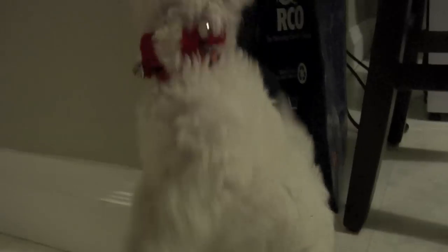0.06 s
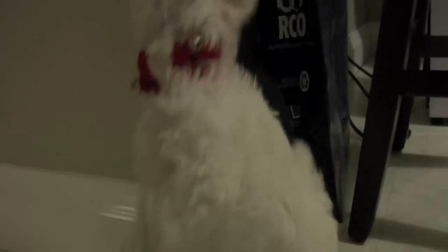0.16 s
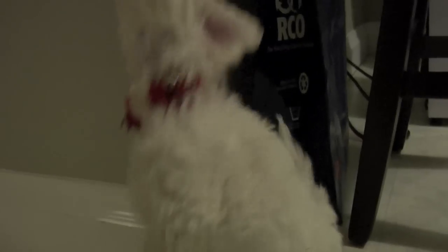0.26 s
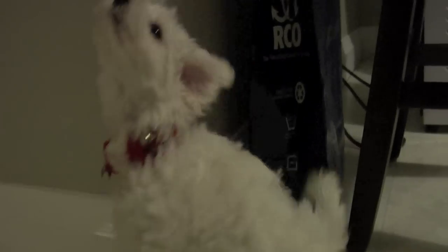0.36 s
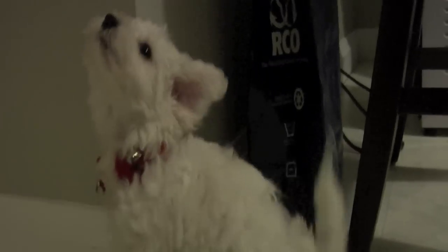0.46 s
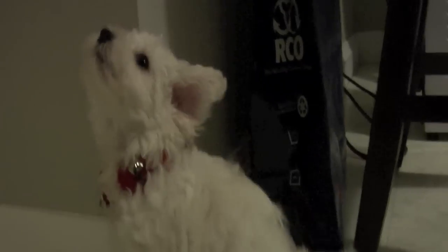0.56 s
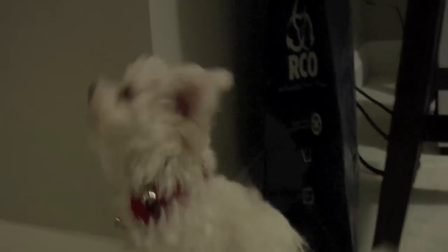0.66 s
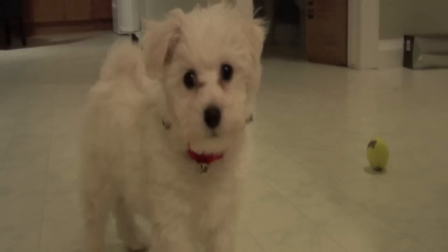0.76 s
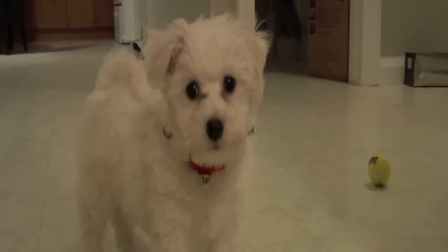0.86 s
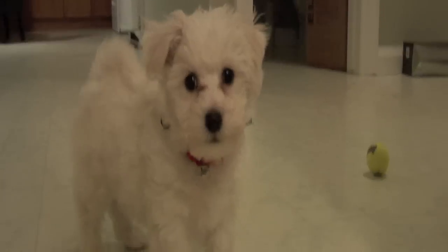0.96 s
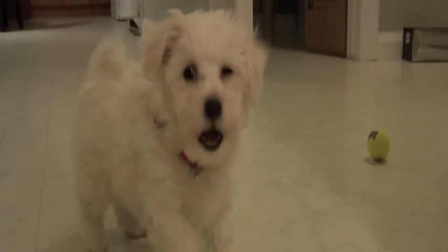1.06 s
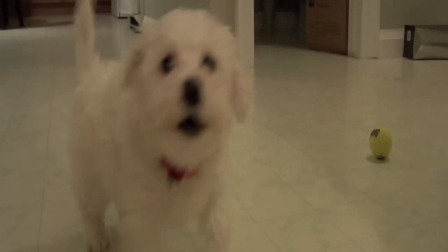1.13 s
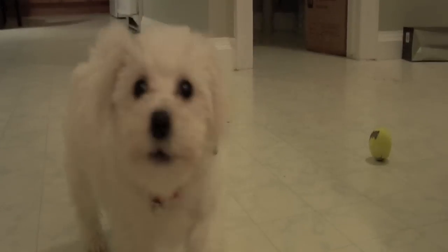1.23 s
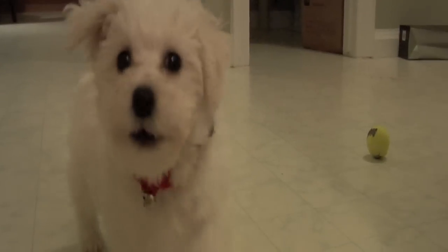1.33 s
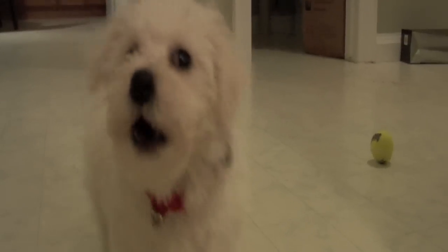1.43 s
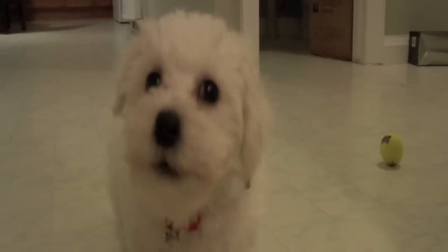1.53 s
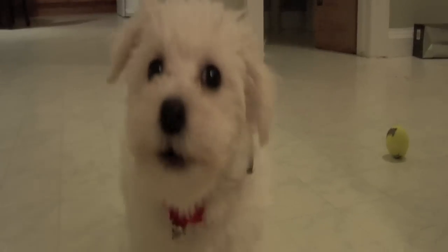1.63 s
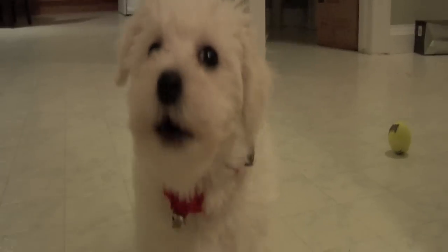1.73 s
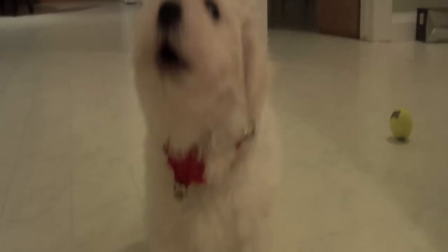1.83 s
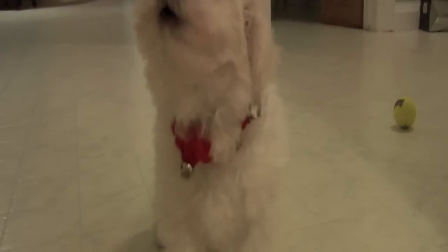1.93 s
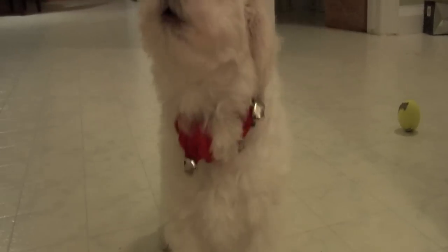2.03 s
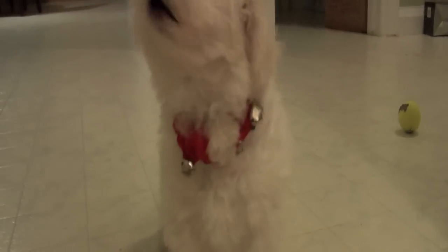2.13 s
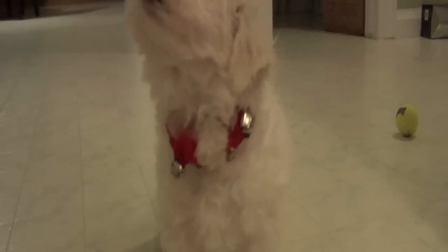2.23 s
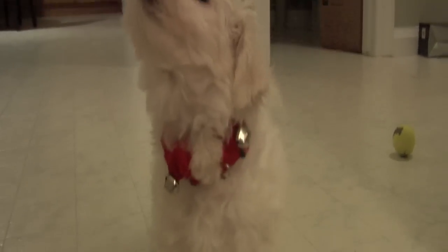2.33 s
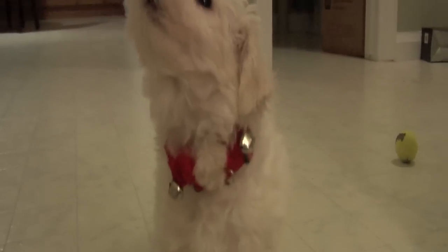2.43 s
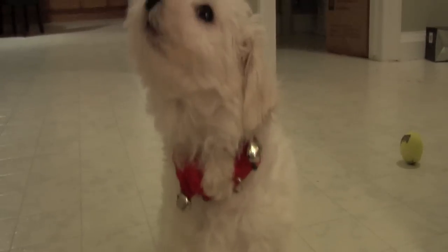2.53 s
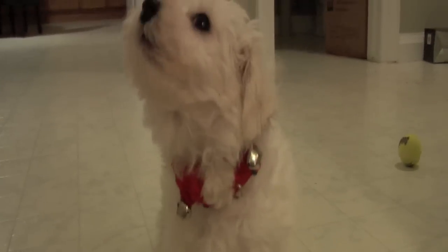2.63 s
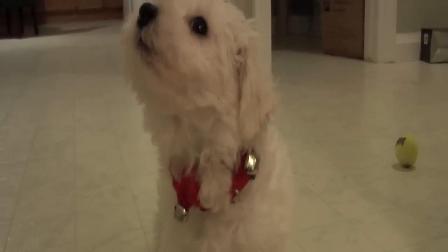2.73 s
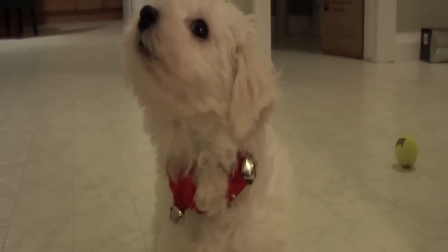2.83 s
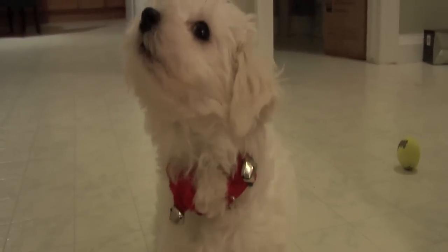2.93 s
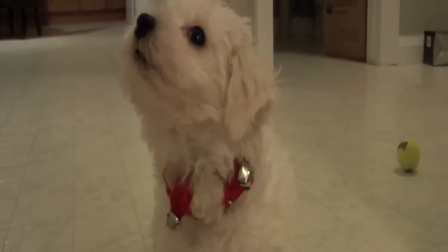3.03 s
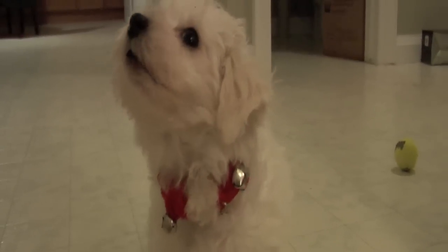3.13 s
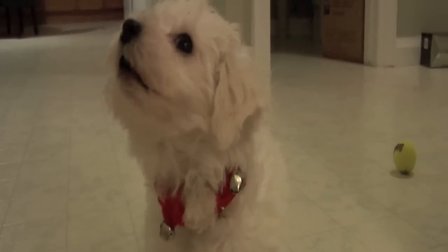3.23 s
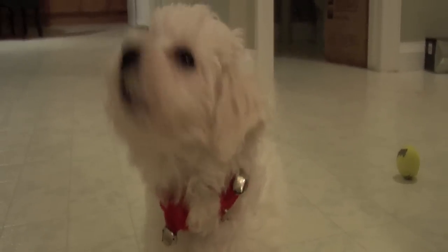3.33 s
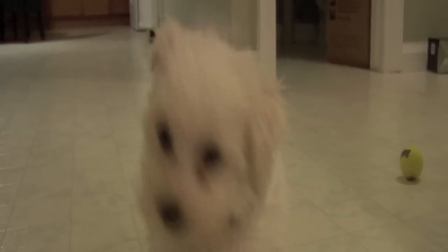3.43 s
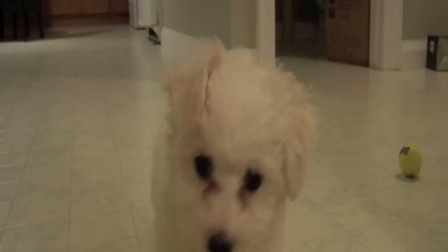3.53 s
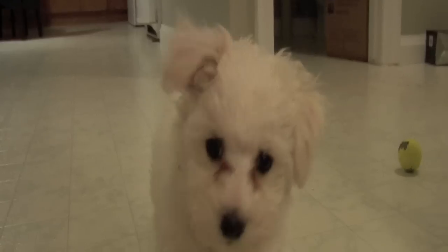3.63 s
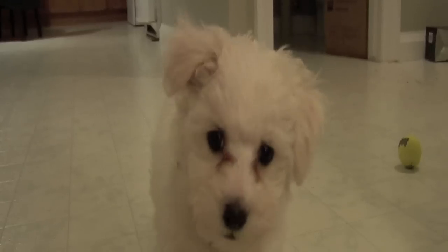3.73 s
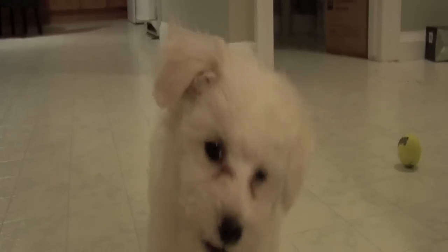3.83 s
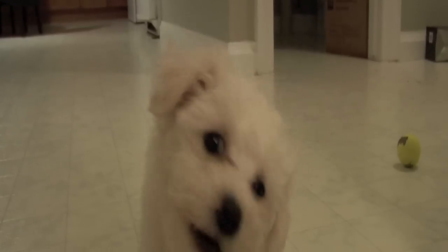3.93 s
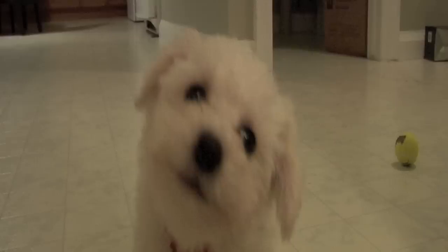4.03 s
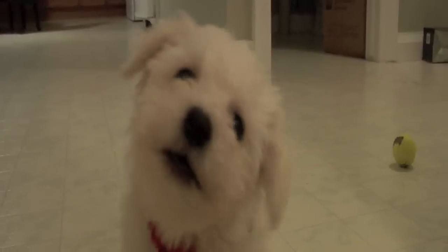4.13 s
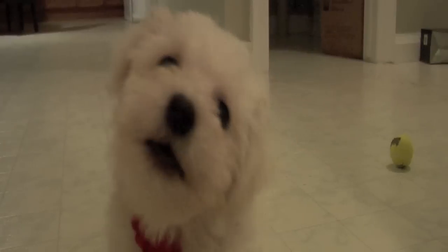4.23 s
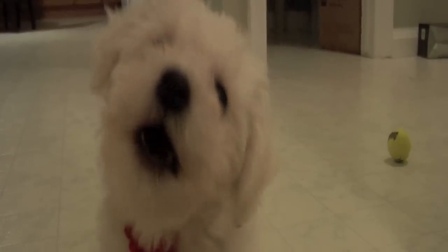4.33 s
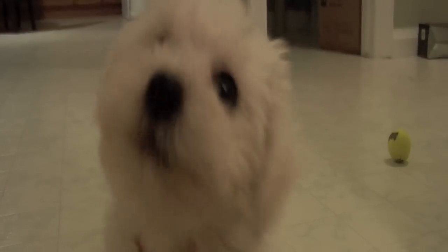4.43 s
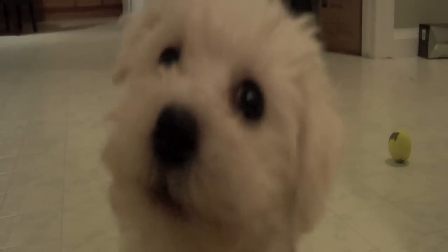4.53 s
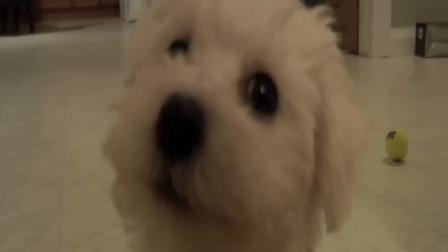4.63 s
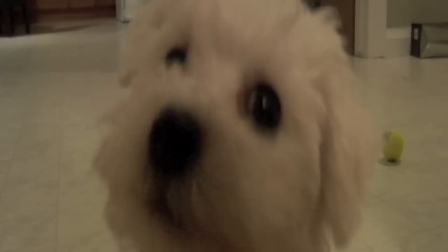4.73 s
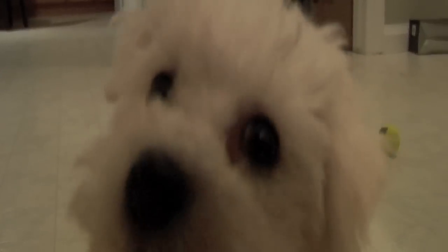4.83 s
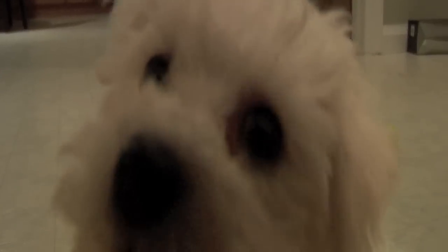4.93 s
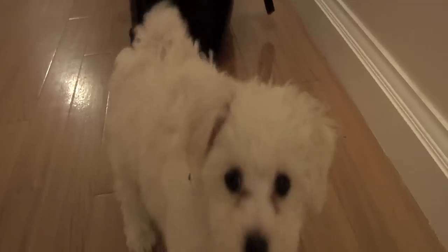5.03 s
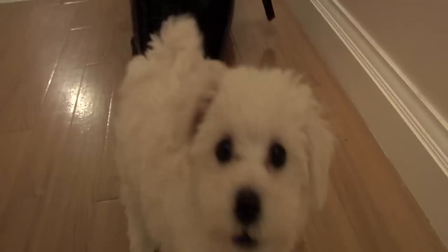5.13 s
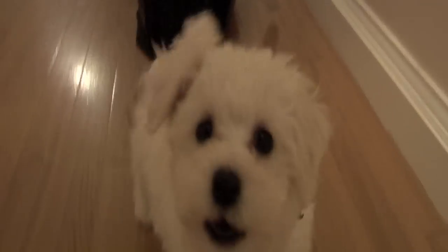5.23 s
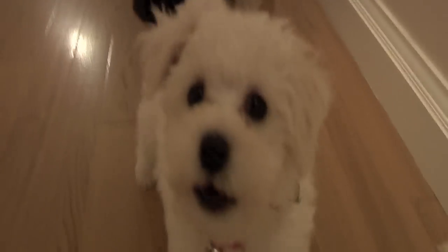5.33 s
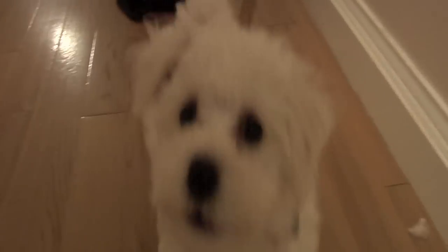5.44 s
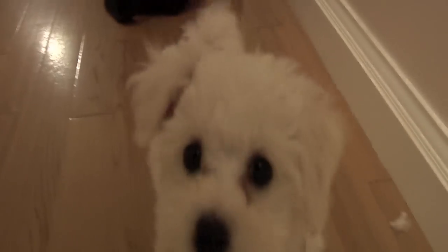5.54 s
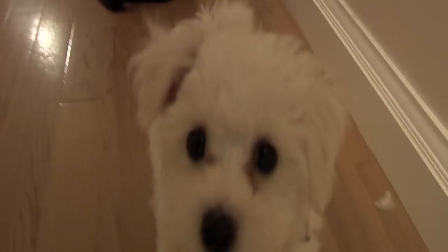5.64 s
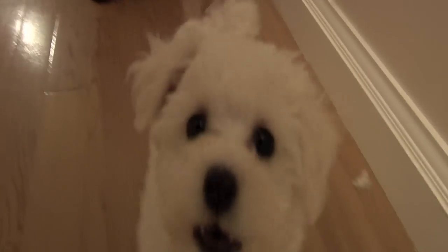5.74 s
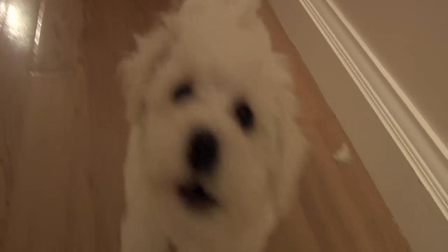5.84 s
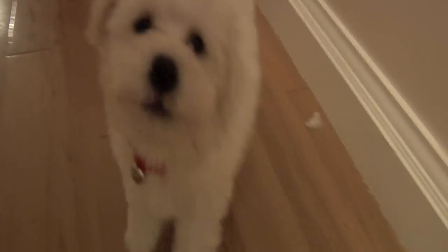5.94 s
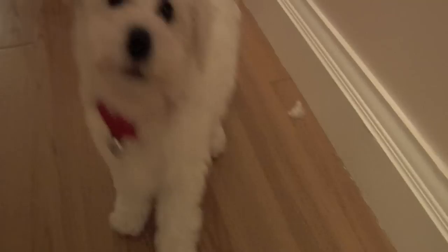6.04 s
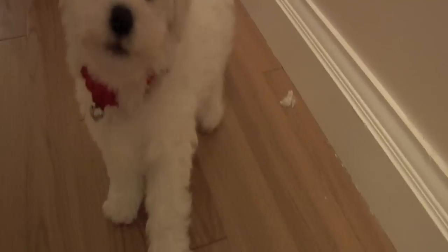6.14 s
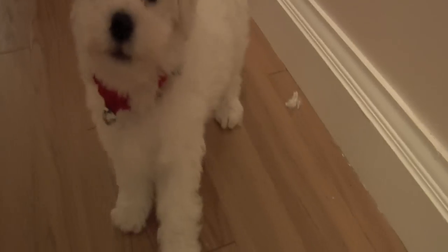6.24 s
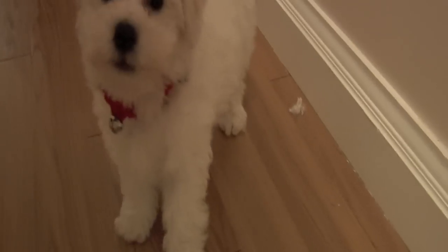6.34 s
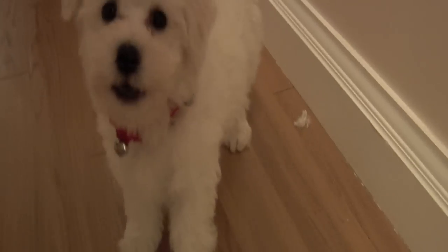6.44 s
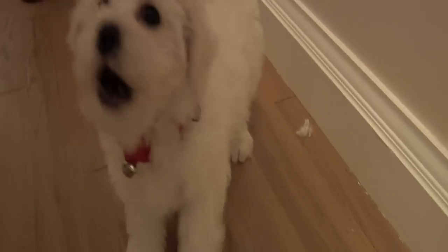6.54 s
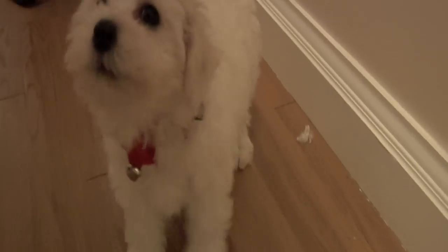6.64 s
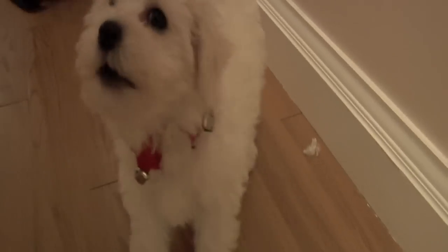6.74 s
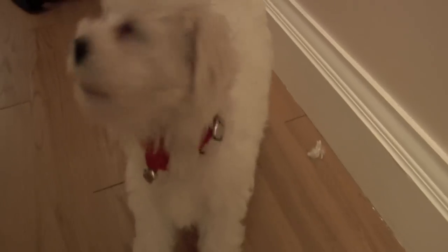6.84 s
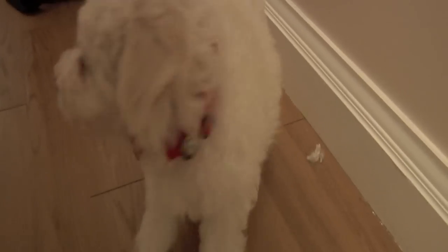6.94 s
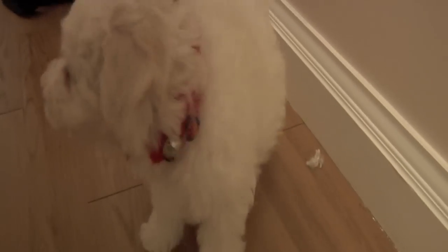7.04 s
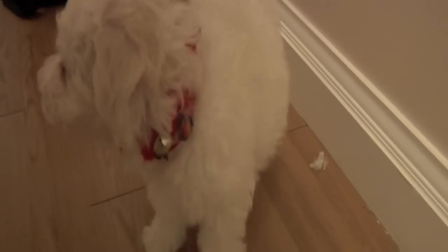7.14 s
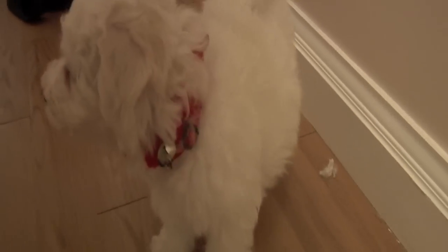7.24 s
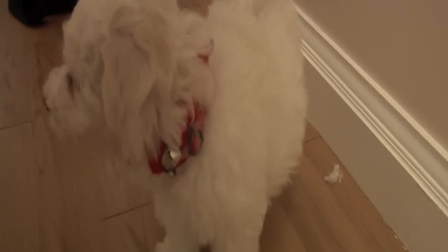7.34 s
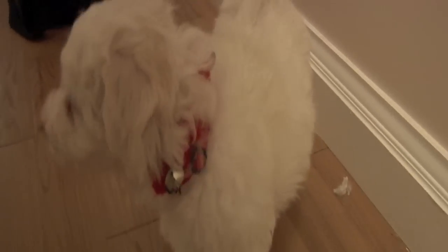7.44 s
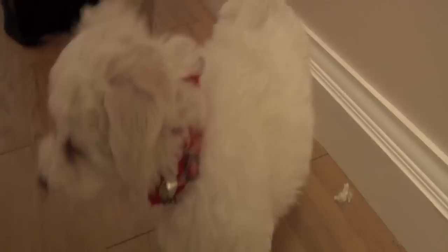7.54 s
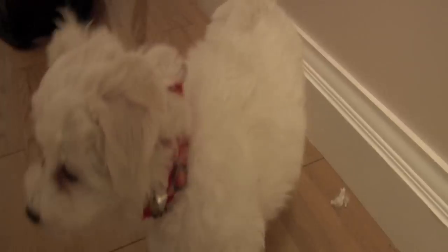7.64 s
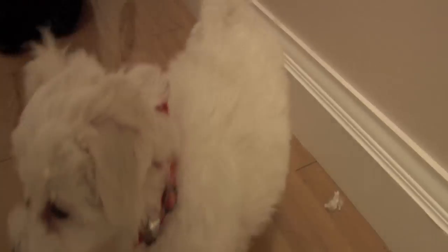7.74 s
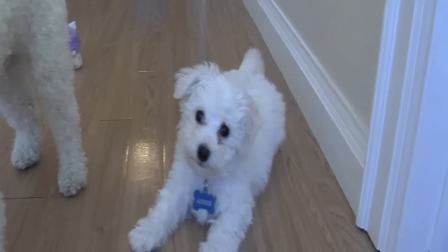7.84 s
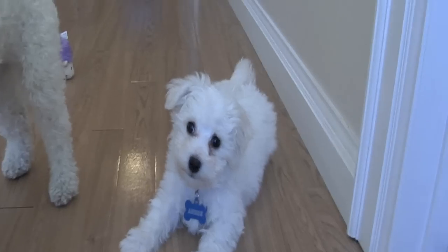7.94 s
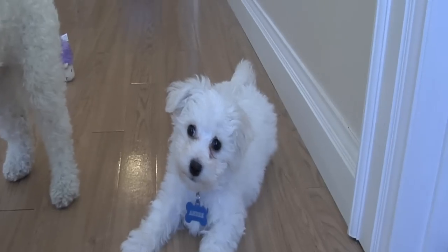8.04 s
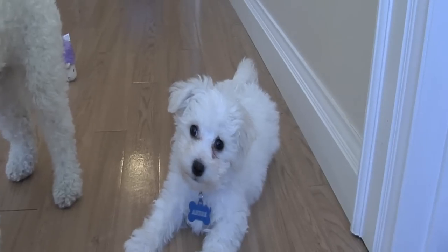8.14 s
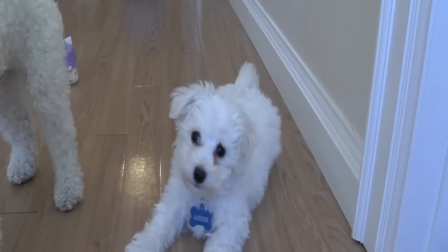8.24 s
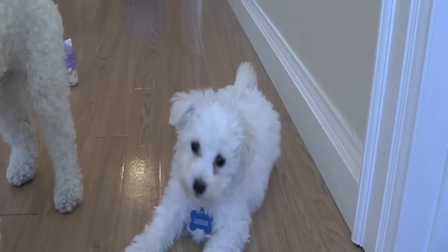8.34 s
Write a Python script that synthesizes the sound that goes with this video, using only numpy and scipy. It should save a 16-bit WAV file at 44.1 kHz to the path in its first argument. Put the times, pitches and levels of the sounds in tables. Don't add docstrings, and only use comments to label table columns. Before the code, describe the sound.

Indoors, a young dog alternates piercing, squeezed yaps with quieter, rough, buzzing grumbles that sometimes flip up into yelps. Lively room echo swells after each yap. There are tiny high bell tinkles, dull paw thumps and faint scuffs, over steady low hiss and a wavering appliance hum. Three short drops to near silence mark new takes; the last stretch has only light paw knocks and quiet room air.

```python
import sys
import numpy as np
from scipy import signal
from scipy.fft import rfft, irfft, next_fast_len
from scipy.io import wavfile
from scipy.ndimage import uniform_filter1d

SR = 44100
rng = np.random.default_rng(int(sys.argv[2]) if len(sys.argv) > 2 else 0)


def magnitude_from_level(level_db):
    exponent = np.asarray(level_db, float) / 20
    return 10 ** exponent


def unload_audio(sound):
    columns = np.transpose(np.atleast_2d(sound))
    steps = np.round(np.clip(columns, -1, 1) * 32767)
    wavfile.write(sys.argv[1], SR, steps.astype(np.int16))


N = 369558
LEAD = SR // 5


def evened(x):
    return x / np.sqrt(np.mean(np.abs(x) ** 2) + 1e-20)


def read(points, hz):
    f, value = np.transpose(points)
    return np.interp(np.log(hz + 1), np.log(f + 1), value)


def curve(points):
    return np.interp(np.arange(N) / SR, *np.transpose(points))


def add(mix, s, sound):
    part = mix[round(s * SR) + LEAD:][:len(sound)]
    part += sound[:len(part)]


def fuzz(count, hz, width):
    r = np.exp(-np.pi * width / SR)
    noise = rng.standard_normal(count) + 1j * rng.standard_normal(count)
    slow = signal.lfilter([1], [1, -r], noise)
    return evened((slow * np.exp(2j * np.pi * hz * np.arange(count) / SR)).real)


def between(rows, place):
    left = np.minimum(place.astype(int), rows.shape[1] - 2)
    return rows[:, left] + (rows[:, left + 1] - rows[:, left]) * (place - left)


def peak(hz, centre, width):
    return 1 / (1 + 2j * (hz - centre) / width) ** 2


# frequency in Hz, level in dB per Hz.
AIR = [(20, -9), (50, -4), (170, -12), (400, -12.5), (640, -7.5), (760, -15.5), (3000, -24), (15500, -31)]
# pitch in Hz, wavering width in Hz, level in dB.
HUM = [(609, 16, -68)]
# time in seconds, level in dB.
HUM_SHARE = [(0, -2), (7.8, -1), (7.9, -8), (8.4, -7)]


def background():
    hz = np.fft.rfftfreq(N, 1 / SR)
    air = evened(irfft(rfft(rng.standard_normal(N)) * magnitude_from_level(read(AIR, hz)), N))
    t = np.arange(N) / SR
    hum = sum(magnitude_from_level(db) * (np.sin(2 * np.pi * f * t) + 0.86 * fuzz(N, f, w)) for f, w, db in HUM)
    return magnitude_from_level(-68.5) * air + magnitude_from_level(curve(HUM_SHARE)) * hum


# start in seconds, peak level in dB, pitch in Hz,
# time to die by 60 dB in seconds, level of the tick in dB beside the bump.
BUMPS = [(0.847, -57.5, 200, .08, -14), (3.318, -28, 354, 0.035, -30.5), (3.332, -55, 868, 0.037, 1),
         (3.46, -32.5, 107, .15, -72), (3.861, -49, 965, 0.069, -8), (4.78, -39.5, 71.5, 0.21, -70),
         (5.985, -24, 154.6, 0.096, -35), (6.885, -32.5, 195, 0.071, -32), (7.92, -48, 412, 0.021, -34),
         (7.945, -38, 538, 0.055, -1.5), (7.954, -40, 183.1, 0.05, -12)]
# middle in seconds, length in seconds, level in dB, pitch in Hz, width in Hz.
SCUFFS = [(3.34, 0.054, -52.5, 2700, 800), (2.668, 0.083, -55, 6610, 4000),
          (3.469, 0.094, -48.5, 13000, 4850), (6.903, 0.071, -71, 9200, 1226),
          (7.774, 0.053, -60.5, 3492, 4600)]


def floor_contacts():
    out, t = np.zeros(N + LEAD), np.arange(8000) / SR
    for s, db, hz, t60, tick_db in BUMPS:
        body = fuzz(len(t), hz, 0.21 * hz) * magnitude_from_level(-60 * t / t60) * np.minimum(t * hz * 2, 1)
        tick = fuzz(len(t), 3000, 1600) * magnitude_from_level(tick_db - 60 * t / 0.018)
        add(out, s, magnitude_from_level(db - 2.5) * (body + tick))
    for s, length, db, hz, width in SCUFFS:
        count = int(length * SR)
        add(out, s - length / 2, magnitude_from_level(db) * fuzz(count, hz, width) * np.hanning(count))
    return out


# pitch in Hz, level in dB, time to die by 60 dB in seconds.
BELL = [(6961, 0, .12), (8156, -6, .12), (8527, -7, .1), (9044, -7, .1), (10250, -14, .1), (11111, -4, .08),
        (12893, -1, .08)]
# start in seconds, level in dB.
JINGLES = [(0.051, -60), (0.099, -61), (0.15, -83), (0.167, -63), (0.385, -68), (.415, -70), (0.466, -61),
           (3.547, -63.5), (4.178, -73), (5.682, -65), (6.1, -74), (6.954, -67), (7.058, -72), (7.096, -70),
           (7.172, -73)]


def bell():
    out, t = np.zeros(N + LEAD), np.arange(6000) / SR
    favour_db = 2.2 * rng.standard_normal((len(JINGLES), len(BELL)))
    for (s, strike_db), favour in zip(JINGLES, favour_db):
        ring = np.zeros(len(t))
        for (hz, db, t60), extra_db in zip(BELL, favour):
            ring += magnitude_from_level(db + extra_db - 60 * t / t60) * np.sin(2 * np.pi * hz * t)
        add(out, s, magnitude_from_level(strike_db) * ring)
    return out


# middle in seconds, half length in seconds, roughness 0-1.
CRACKS = [(1.866, .011, .35), (5.116, .006, .3), (6.569, .014, .6)]
BREAK_HZ, BREAK_OCTAVES = 726, 0.27
FIRM_DB, FIRM_CLEARS = -27.5, 0.77
GRUMBLE_HALF_DB, HOARSE_HALF_DB = 7.5, -3
OPEN_HZ, MOUTH_POWER, HOARSE_MOUTH = 1030, 0.69, 1.393
FLIP_S, FLIP_ROUGH, YELP_ROUGH = .018, .2, .003


def manner(t, effort_db, hz, hoarse_s, grumble_rough, yelp_half_db, mouth, tilt_db):
    yelp = (1 + np.tanh(np.log2(hz / BREAK_HZ) / BREAK_OCTAVES)) / 2
    yelp = np.maximum.accumulate(yelp)
    flip = np.clip(np.gradient(yelp, t) * FLIP_S, 0, 1)
    hoarse = np.clip((t[0] + hoarse_s - t) / 0.012, 0, 1)
    octaves_per_s = uniform_filter1d(np.gradient(np.log2(hz), t), size=30)
    glide = np.tanh(octaves_per_s / 23)

    slack = grumble_rough * (1 - FIRM_CLEARS * (1.5 + np.sign(effort_db - FIRM_DB)) / 2)
    rough = slack + (YELP_ROUGH - slack) * yelp + FLIP_ROUGH * flip
    for s, half_s, chaos in CRACKS:
        rough = rough + chaos * np.clip(2 - 2 * abs(t - s) / half_s, 0, 1)
    rough = rough + (grumble_rough - rough) * hoarse

    half_db = GRUMBLE_HALF_DB + (yelp_half_db - GRUMBLE_HALF_DB) * yelp
    half_db = half_db + (HOARSE_HALF_DB - half_db) * hoarse
    mouth = mouth * np.minimum(hz / OPEN_HZ, 1) ** MOUTH_POWER * HOARSE_MOUTH ** hoarse

    tilt_db = tilt_db + 2.5 * flip + 2.5 * glide + 6.5 * np.minimum(glide, 0)
    tilt_db = tilt_db - 5 * (1 - yelp) - hoarse + 0.054 * effort_db
    return rough, half_db, mouth, tilt_db


# pitch in Hz, width in Hz, level in dB, how far it follows the mouth (0-1).
THROAT = [(260, 54, 10.5, 0.067), (950, 392, 20, 0.62), (1702, 500, 19.5, .3), (2453, 421, 19, 0.67),
          (3415, 80, -7.5, .2)]
# pitch in Hz, width in Hz, level in dB.
HEAD = [(6500, 700, -50), (8300, 900, -50), (10500, 800, -45), (12600, 2600, -47)]
STEP = 32
JAW_S, MUZZLE_WIDTH_HZ, MUZZLE_FADE_DB_PER_S = .2, 610, -49.5
SMEAR_POWER, SMEAR_HZ = 1.5, 1100


def call(rows, way, change):
    s, *columns = np.transpose(rows)
    t = np.arange(s[0], s[-1], 1 / SR)
    effort_db, pitch = (np.interp(t, s, c) for c in columns)
    pairs = np.cumsum(uniform_filter1d(pitch, size=130)) / SR / 2
    hz = pitch[::STEP]
    rough, half_db, mouth, tilt_db = manner(t[::STEP], effort_db[::STEP], hz, *way)

    brighten_db, close, muzzle_hz, muzzle_db, head_db = change
    gone, age = np.linspace(0, 1, len(hz)), t[::STEP] - s[0]
    mouth = mouth * 2 ** (close * (.5 - gone))
    tilt_db = tilt_db + brighten_db * (gone - .5)

    leak = np.interp(t, t[::STEP], (np.clip(rough, 0, 1) + .01) ** 0.56)
    k = np.arange(1, 60)[:, None]
    line_hz = k * hz / 2
    rough = np.clip(rough * np.maximum(line_hz / SMEAR_HZ, 1) ** SMEAR_POWER, 0, 1)

    peaks = [magnitude_from_level(db) * peak(line_hz, f * mouth ** follow, w) for f, w, db, follow in THROAT]
    sinking_hz = muzzle_hz * np.exp(-(age / JAW_S) ** 3)
    muzzle_level = magnitude_from_level(muzzle_db + MUZZLE_FADE_DB_PER_S * age)
    peaks.append(muzzle_level * peak(line_hz, sinking_hz, MUZZLE_WIDTH_HZ))
    delay = np.exp(.5j * sum(np.angle(p) for p in peaks))
    throat = (magnitude_from_level(-22) + sum(abs(p) for p in peaks)) * delay

    size = throat * magnitude_from_level(tilt_db * np.log2(np.maximum(k / 2, 1)))
    size /= np.sqrt((abs(size) ** 2).sum(0) / 2)
    size += magnitude_from_level(-59) + sum(magnitude_from_level(db + head_db) * peak(line_hz, f, w) for f, w, db in HEAD)
    size *= magnitude_from_level(half_db * (k % 2)) * np.clip((16000 - line_hz) / 1500, 0, 1)
    size /= np.sqrt((abs(size) ** 2).sum(0) / 2)

    chance = rng.standard_normal((400, 60, 2)) @ [1, 1j]
    chance = (0.98 * chance[:, :-1] + 0.54 * chance[:, -1:]).T
    size *= np.sqrt(1 - rough) + np.sqrt(rough) * between(chance, 1.3 * pairs[::STEP])

    turning = np.cumprod(np.exp(2j * np.pi * pairs) * np.ones_like(k), axis=0)
    voice = -(between(size, np.arange(len(t)) / STEP) * turning).sum(0).real
    breath = leak * sum(magnitude_from_level(db + head_db + 5.5) * fuzz(len(t), f, w) for f, w, db in HEAD)
    return s[0], magnitude_from_level(effort_db) * (voice + breath) * signal.windows.tukey(len(t), .04)


# time in seconds, breath effort in dB, pitch of
# the folds in Hz.
CALLS = [
    [(-.13, -40, 505), (-.1, -11, 858.4), (-.065, -9.5, 878), (-.05, -10, 1054), (-.02, -8.5, 1082),
     (-.01, -8.5, 1257), (.046, -9, 1233), (.058, -23.5, 1204), (.08, -49.5, 897)],
    [(.252, -44.5, 388.6), (.27, -31.5, 422.6), (.3, -26.5, 434.2), (.33, -31.5, 508), (.38, -38, 381),
     (.52, -39, 360.3), (.6, -44.5, 324.2), (.68, -46, 304.5), (.74, -55.5, 260)],
    [(1.093, -43.5, 802), (1.109, -4, 1396), (1.117, -13.5, 1328), (1.126, 1.5, 1355), (1.134, -7, 1048),
     (1.162, -10.5, 1075), (1.17, -6, 1319), (1.207, -8.5, 1288), (1.255, -38.5, 588)],
    [(1.39, -42.5, 420.6), (1.425, -20.5, 568.3), (1.436, -11, 902), (1.45, -0.5, 950), (1.474, 0.5, 1129),
     (1.482, -5.5, 1274), (1.54, -8.5, 1312), (1.56, -16, 1018), (1.595, -26, 556.6)],
    [(1.8, -46.5, 416), (1.852, -23.5, 538.4), (1.86, -14.5, 740), (1.88, -5.5, 894.5), (1.915, -0.5, 1066),
     (1.921, -11, 1257), (1.942, -4, 1264), (1.975, -11, 1130), (2.005, -29, 635)],
    [(2.277, -56, 408.3), (2.29, -38.5, 390.7), (2.36, -31, 477), (2.52, -33.5, 437.8), (2.57, -30, 481.6),
     (2.595, -21.5, 624.4), (2.613, -14, 806.6), (2.65, -15.5, 809.3), (2.72, -34.5, 611)],
    [(3.33, -35, 414), (3.37, -29, 542.7), (3.382, -18.5, 610), (3.394, -12.5, 643), (3.399, -14, 868),
     (3.408, -6.5, 862), (3.425, -14.5, 905.5), (3.44, -19, 910), (3.47, -47, 808)],
    [(3.948, -46, 449), (3.957, -17, 647.4), (3.968, -11, 818.6), (3.98, -10, 948.7), (4.0, 0.5, 1033),
     (4.013, -7.5, 1005), (4.027, -7.5, 1188), (4.042, -5.5, 1111), (4.078, -23, 583)],
    [(4.337, -28, 399), (4.35, -37.5, 401), (4.4, -23.5, 468), (4.44, -17.5, 556), (4.47, -24, 541),
     (4.52, -27, 457.1), (4.57, -33.5, 438.3), (4.715, -35, 384.6), (4.73, -49, 372)],
    [(5.05, -47.5, 416.7), (5.075, -36.5, 500), (5.095, -30.5, 775), (5.112, -23, 948), (5.119, -17, 789),
     (5.138, -12, 861.4), (5.172, -18, 882.4), (5.182, -17.5, 821), (5.205, -37.5, 564.5)],
    [(5.412, -37.5, 391), (5.465, -32, 397.3), (5.49, -24.5, 509), (5.512, -22, 557), (5.52, -15.5, 686.5),
     (5.54, -19, 712.4), (5.56, -22.5, 640), (5.58, -42, 564), (5.6, -53.5, 500)],
    [(5.853, -41.5, 451.6), (5.862, -36.5, 458.5), (5.88, -18, 579.4), (5.89, -15.5, 737.3),
     (5.92, -12.5, 921.4), (5.935, -2, 1015), (5.955, -8, 1090), (5.97, -13, 1143), (5.98, -48.5, 1240)],
    [(6.534, -33, 402), (6.557, -5, 1209), (6.567, -12, 1054), (6.58, -10, 1017), (6.597, 3.5, 1125),
     (6.613, -4, 1115), (6.62, -4.5, 1297), (6.64, -7.5, 1243), (6.68, -42, 600)],]
# length of hoarse start in seconds, grumble roughness 0-1,
# half-pitch lines in the yelp in dB, mouth factor, brightness tilt in dB per octave.
MANNER = [(0.025, 0.4, -38, .98, -3), (.001, .35, -12, 1.1, -8), (.072, 0.6, -35.5, 1.08, -3.5),
          (0.00089, .1, -37.5, 1.1, -6), (.001, 0.5, -39.5, 1.1, -7), (.001, 0.9, -7, 0.98, -8),
          (0.0014, 1, -7.5, 0.92, -5), (0.024, 0, -34.5, 1.075, -5), (.001, 0.8, -13.5, 0.96, -7),
          (.001, 0.6, -28, 0.98, -3), (0.00062, .25, -12, 0.83, -4.5), (.001, .15, -43.5, 1.127, -7),
          (0.055, 0, -39, 1.064, -3)]
# brightening in dB per octave (negative dulls), jaw closing
# in octaves, muzzle resonance in Hz, its level in dB, level of the head cavities in dB.
CHANGE = [(0, -0.16, 2000, -5.5, -5.5), (-12.5, 0.35, 1700, 0, -2), (-5, -0.016, 3200, 5.5, 5.1),
          (-1.5, 0.24, 1900, -4, 5), (5, 0.23, 3600, -3.5, 3.5), (-4.5, 0.05, 3300, 5, -4),
          (-3.5, 0.083, 2300, 5, 1), (-9.5, .2, 3850, 11.5, -1), (-9, .2, 3700, 22.5, -1.5),
          (6, .1, 3280, 17, 6.5), (-2.5, .1, 3600, 8, .1), (-12, 0.34, 4100, 11, 8),
          (4, .1, 3450, 12.5, -1.1)]


def puppy():
    out = np.zeros(N + LEAD)
    for rows in zip(CALLS, MANNER, CHANGE):
        add(out, *call(*rows))
    return out


# frequency in Hz, time to die by 60 dB in seconds.
ROOM = [(200, .65), (600, 0.75), (1200, 1.031), (2500, 0.79), (5000, 0.83), (8000, 0.57)]


def room(x, stretch):
    taps = np.zeros(2 * SR)
    at = np.arange(200, 2 * SR - 20, 20)
    taps[at + rng.integers(0, 20, len(at))] = rng.choice([-1., 1.], len(at))
    hz, t, z = signal.stft(taps, SR, nperseg=256)
    dying = magnitude_from_level(-60 * t / (stretch * read(ROOM, hz)[:, None]))
    tail = signal.istft(z * dying, SR, nperseg=256)[1]
    tail *= np.minimum(np.arange(len(tail)) / (.035 * SR), 1)
    return signal.fftconvolve(x, tail / np.linalg.norm(tail))[:len(x)]


JOINS = [-1, .82, 5.045, 7.858, 9]
# level in dB, factor on how long it lasts.
TAKES = [(-13, 1.008), (-13, 0.93), (-12, 0.86), (-30, 1.1)]


def echoes(near):
    t, out = (np.arange(N + LEAD) - LEAD) / SR, np.zeros(N + LEAD)
    for start, end, (echo_db, stretch) in zip(JOINS, JOINS[1:], TAKES):
        inside = (t >= start) & (t < end)
        out[inside] = magnitude_from_level(echo_db) * room(near[inside], stretch)
    return out


# frequency in Hz, level in dB.
CAPSULE = [(100, -31), (170, -3.5), (300, -2), (4000, -4), (5500, -1.5), (15500, -13)]


def microphone(x):
    count = next_fast_len(len(x))
    hz = np.fft.rfftfreq(count, 1 / SR)
    heard = irfft(rfft(x, count) * magnitude_from_level(read(CAPSULE, hz)), count)
    return heard[LEAD:LEAD + N]


def scene():
    near = puppy() + floor_contacts()
    out = near + bell() + echoes(near)
    return (microphone(out) + background())[None]


# middle in seconds, fade out in seconds, fade in in seconds, depth in dB.
DIPS = [(0.822, .06, .025, -26), (5.045, .045, 0.041, -30), (7.858, 0.064, 0.06, -23.5)]


def dips():
    t = np.arange(N) / SR
    return magnitude_from_level(sum(db * np.interp(t, [s - out, s, s + back], [0, 1, 0]) ** 1.1 for s, out, back, db in DIPS))


def gain_control(dry):
    power_db = 10 * np.log10(abs(uniform_filter1d(dry[0] ** 2, size=200)) + 1e-12)
    fall = np.arange(N) * 60. / SR
    held_db = np.maximum.accumulate(power_db + fall) - fall
    over_db = np.maximum(held_db + 16.0, 0)
    return dry * magnitude_from_level(4 - 0.73 * uniform_filter1d(over_db, size=150))


def low_pass(x):
    return signal.sosfilt(signal.butter(12, 15800, fs=SR, output="sos"), x)


def record(dry):
    held = gain_control(dry)
    lopsided = held + 0.07 * held ** 2
    clipped = np.clip(lopsided, -.72, .72)
    steady = signal.lfilter(*signal.butter(1, 20, "high", fs=SR), clipped)
    return low_pass(steady * dips())


dry = scene()
out = record(dry)
unload_audio(out)
```